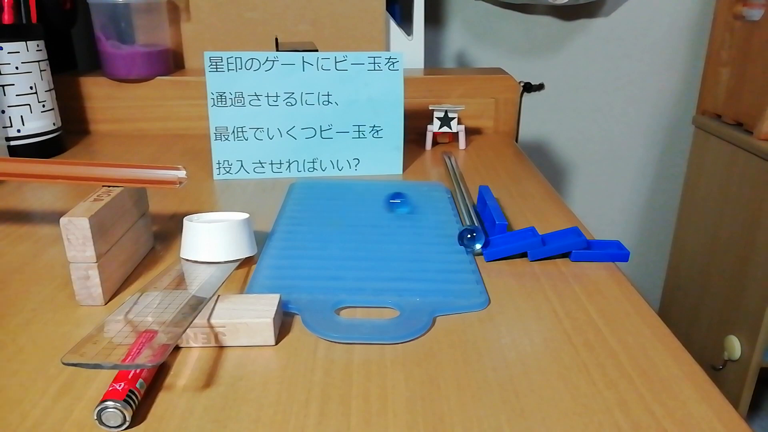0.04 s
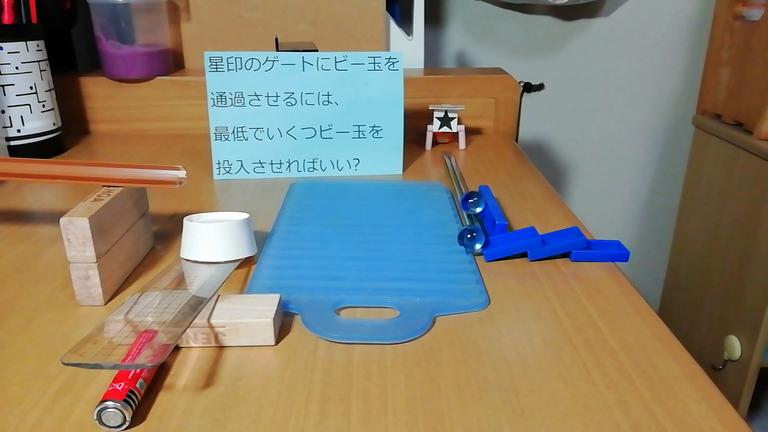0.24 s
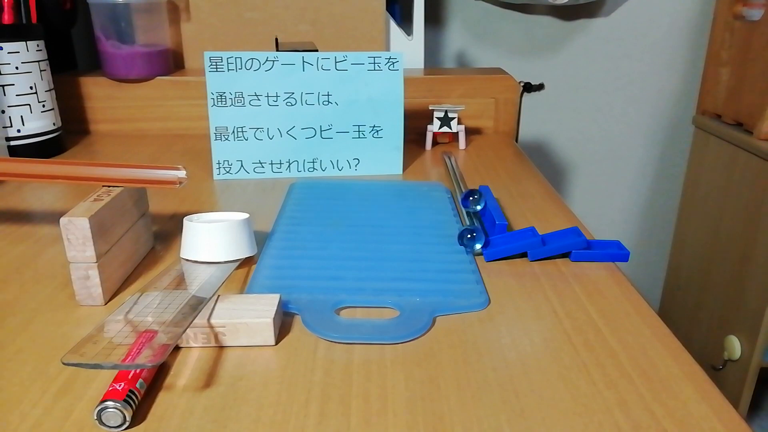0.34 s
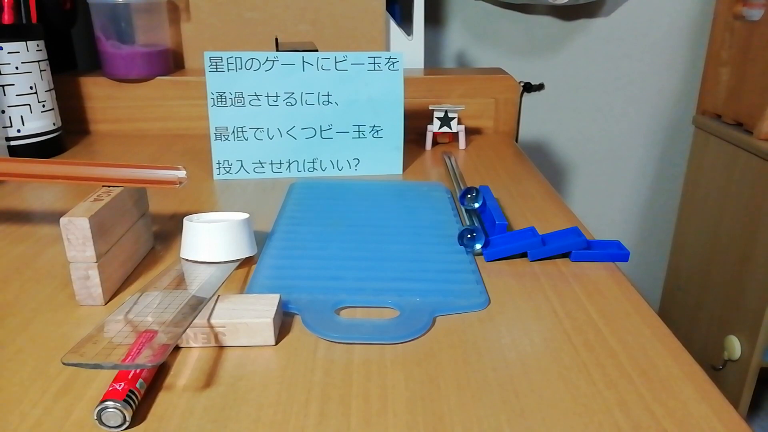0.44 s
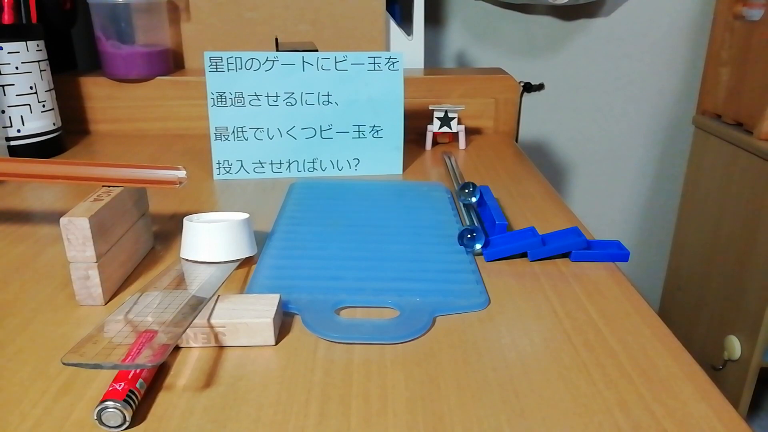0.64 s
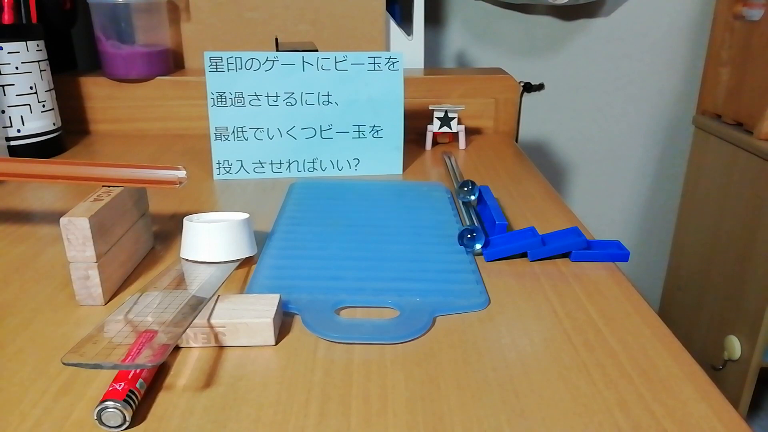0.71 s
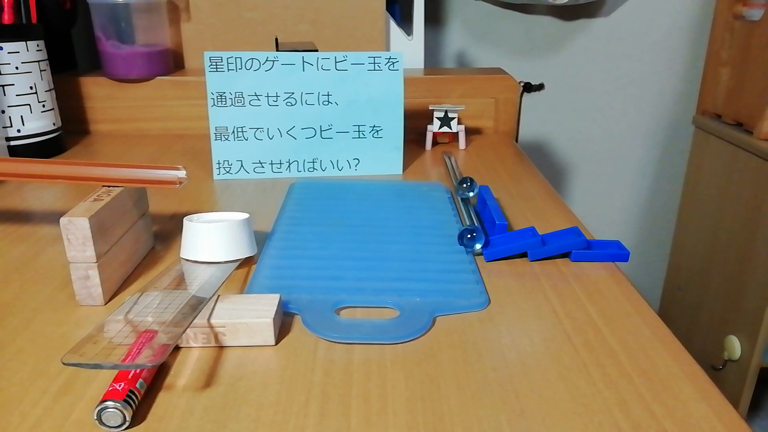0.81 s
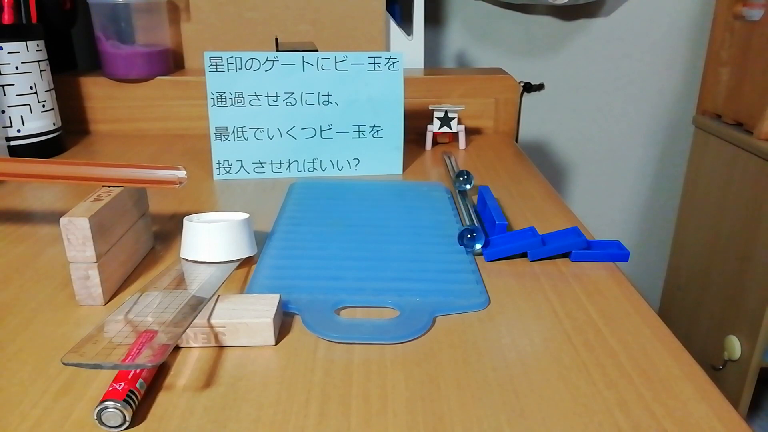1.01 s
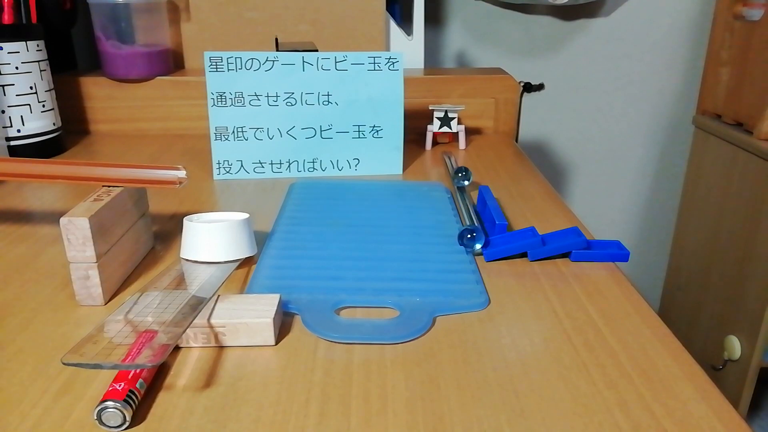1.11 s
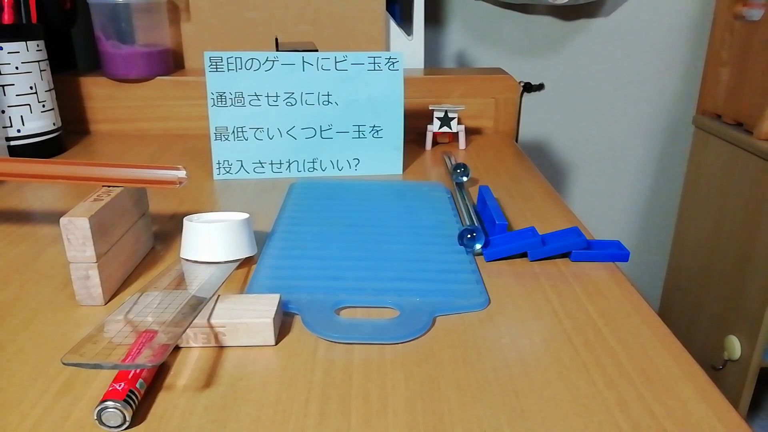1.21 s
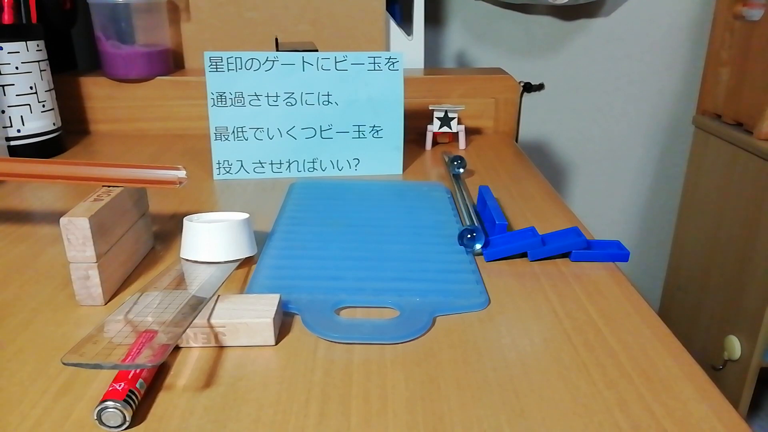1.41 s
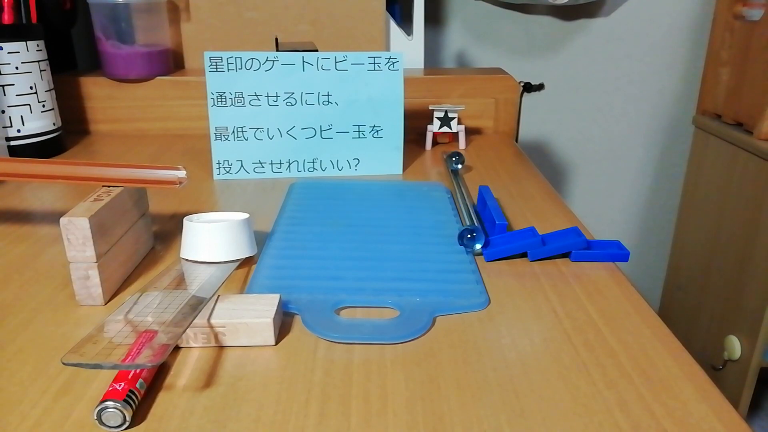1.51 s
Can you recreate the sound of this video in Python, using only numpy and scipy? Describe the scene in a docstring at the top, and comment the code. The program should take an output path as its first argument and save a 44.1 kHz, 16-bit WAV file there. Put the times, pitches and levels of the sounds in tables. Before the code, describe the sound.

Glass marbles clack together on a metal rail on a desk in a small, quiet room. At the start, a soft, hollow bump on a plastic board dies away. From about 0.2 to 0.3 seconds comes a cluster of bright clacks with a duller knock, then softer rebounds until 0.5. From 0.6 to 1.5 seconds one marble rolls very faintly, with scattered light ticks and a thin metallic ring.

```python
"""Marbles on a metal rail

A bump on a plastic board dies away. A glass marble drops against others on a metal rail on a desk:
the impacts give a few bright clacks and two duller knocks, and excite the modes of rail and desk.
One marble rolls off, ticking and making the rail sing faintly. The desk and the walls of a small
room reflect it all into two microphone ports that resonate near 9 kHz."""
import sys
import numpy as np
from scipy import signal
from scipy.fft import rfft, irfft
from scipy.io import wavfile
from scipy.ndimage import uniform_filter1d

SR = 44100
rng = np.random.default_rng(int(sys.argv[2]) if len(sys.argv) > 2 else 0)


def dump_mix(stems):
    """Bounce the given channels to the path in sys.argv[1] as a 16-bit WAV at rate SR."""
    frames = np.atleast_2d(stems).T  # one column per channel
    limited = np.clip(frames, -1, 1)  # hard clip at full scale
    pcm = np.round(limited * 32767).astype(np.int16)
    wavfile.write(sys.argv[1], SR, pcm)


N = 68355

# Spectra of the steady noises. Each row: frequency in Hz, relative level in dB.
RUMBLE_SPECTRUM = [(20, -0.5), (45, -4.5), (90, -3.5), (150, -4), (230, -14), (350, -24), (600, -47),
                   (2000, -52.5)]
AIR_SPECTRUM = [(100, 2), (1500, -1.5), (4000, -4), (9000, -10), (16000, -16.5)]
MICROPHONE_SPECTRUM = [(30, -13.5), (300, 2), (600, -2.5), (1300, 2), (2500, -1.5), (5000, -2.5),
                       (7500, -4.5), (11000, -8.5), (16000, -9.5)]

# Impacts. Each row: start in seconds, relative level in dB, left minus right in dB, cut-off in Hz.
BUMP = [(.001, -5.5, -1.5, 12140)]  # a marble bumps the plastic board
CLACKS = [(.2318, -1, 4.5, 14750), (.2432, -8, -6, 14780), (.2460, -17.5, -6.5, 15000)]  # the arriving marble strikes the waiting one
JOSTLES = [(.2750, -8.5, -3.5, 10500), (.2845, -3, 3.5, 10000), (.3090, -4.5, -4, 11500),
           (.3180, -11, 6.5, 11500)]  # the pair jostles as it settles
KNOCKS = [(.2883, -2.5, -1.5, 12960), (.3893, -23, 1, 6200)]  # a marble drops onto the rail
REBOUNDS = [(.4406, 1.5, 2, 11570), (.4895, -2, 5, 14500), (.4935, -4, -7, 10800)]  # it rebounds between the rods
TICKS = [(.6248, 1.5, -1, 10100), (.6865, -15, -10, 10300), (.7450, -18, 15, 9920),
         (.9045, -15.5, 5, 10000), (.9355, -9, 5, 9500), (1.1608, 1.5, -2, 10800), (1.1765, 1, -2, 10000),
         (1.1865, -1.5, 9, 10100), (1.2100, -5.5, -3, 10100), (1.4495, -1.5, -0.5, 9800),
         (1.4795, -7.5, 9, 10200)]  # it touches lightly as it rolls

# Spectra of the contacts. Each row: frequency in Hz, relative level in dB.
BUMP_SPECTRUM = [(60, -5), (170, -4.5), (245, 1.5), (330, 7), (500, -11.5), (800, 3), (1120, 6.5),
                 (1600, -6), (3000, -7.5), (6000, -11.5), (9000, -22), (15000, -33.5)]
CLACK_SPECTRUM = [(150, -33), (240, -24), (450, -29.5), (740, -22), (1150, -33), (1950, -19.5), (3400, -25),
                  (3900, -10), (5500, -18.5), (6500, -1.5), (7300, -14.5), (8300, -10), (9150, -4.5),
                  (9600, 3.5), (10000, -10), (10800, -8.5), (12600, -14.5), (14300, -25.5), (15200, -18.5)]
JOSTLE_SPECTRUM = [(300, -27), (1900, -24.5), (3000, -19.5), (4200, -15.5), (5500, -11.5), (6100, -2),
                   (7300, -7.5), (8300, -10.5), (8900, -0.5), (9250, -7), (10500, -15.5), (14000, -17)]
KNOCK_SPECTRUM = [(200, -38), (570, -33.5), (735, -12), (930, -30), (1500, -16), (2400, -16), (3300, -10.5),
                  (4000, -3), (4700, 1.5), (5500, -17), (6500, -11.5), (10000, -14.5), (12200, -26.5),
                  (13000, -5), (14500, -45)]
REBOUND_SPECTRUM = [(300, -18), (3300, -18.5), (4200, -5), (5500, -7), (6300, 9.5), (6900, -5.5),
                    (7400, 0.5), (8300, -11), (8900, -4), (10800, -13), (11300, -3.5), (12400, -7),
                    (13300, -12), (15500, -20)]
TICK_SPECTRUM = [(300, -20), (3000, -24), (4400, -5), (5400, -23), (6200, -12.5), (7200, -15),
                 (8700, -10.5), (9120, 5), (9480, -14), (15000, -24)]
ROLL_SPECTRUM = [(300, -9), (1500, -8.5), (4200, 4), (5500, -16), (7900, 7), (8600, -6.5), (9200, 5.5),
                 (10300, -12), (12400, -11), (16000, -19)]

# Normal modes. Each row: frequency in Hz, relative level in dB, time to decay by 60 dB in seconds.
BOARD_MODES = [(245, 0.5, 0.11), (320, -0.5, 0.1211), (1155, -8.5, .04)]
RAIL_MODES = [(4536, -21, 0.039), (6250, -11.5, .12), (6460, -2.5, 0.33), (6500, -5, 0.082),
              (7900, -10.5, 0.13), (8960, -3, 0.19)]
DESK_MODES = [(240, -3, 0.066), (732, -6, .035), (1520, 2, 0.055), (1950, 0.5, 0.046), (2612, -3.5, 0.12)]  # the rail's support and the desk top
SINGING_MODES = [(6277, -2, 0.041), (6620, 4, 0.014), (9440, -19, 0.03)]  # the rail under the rolling marble

# Swells of the rolling. Each row: time in seconds, contact hiss in dB, singing of the rail in dB.
ROLL_LEVELS = [(.55, -89.5, -112), (.85, -88.5, -100), (.92, -97, -82), (1.03, -88, -78.5),
               (1.12, -85.5, -87.5), (1.26, -92, -86), (1.33, -77, -84), (1.419, -98, -79.5),
               (1.462, -80, -68.5), (1.55, -76, -76)]

# Early reflections, a list per port, left then right. Each row: delay in seconds, relative level in dB.
ECHOES = [
    [(.0029, 2.5), (.0058, -8.5), (.0095, -10)],
    [(.0019, 1), (.0040, 0.5), (.0062, -7.5), (.0095, -8.5)],
]
# Reverberation of the room. Each row: frequency in Hz, time to decay by 60 dB in seconds.
ROOM_T60 = [(200, 0.32), (1500, 0.21), (5000, 0.2), (9000, 0.2), (15000, 0.087)]
# Port resonances, left then right. Each row: frequency in Hz, bandwidth in Hz, resonant gain in dB.
PORTS = [(9086, 223, 22.5), (8776, 810, 14)]


def undb(db):
    """Amplitude ratio of a level in dB."""
    return 10 ** (np.asarray(db) / 20)


def unit(x):
    """The signal scaled to unit RMS."""
    return x / np.sqrt(np.mean(x ** 2))


def along(points):
    """A table of (Hz, value) interpolated over log frequency at every bin of the spectrum."""
    hz, value = np.array(points, float).T
    bin_hz = np.arange(N + 1) * SR / (2 * N)
    return np.interp(np.log(bin_hz + 1), np.log(hz), value)


def colour(x, points):
    """Minimum-phase filtering: folding the cepstrum makes the (Hz, dB) response causal."""
    cepstrum = irfft(np.log(undb(along(points))))
    cepstrum[1:N] *= 2
    cepstrum[N + 1:] = 0
    return irfft(rfft(x, 2 * N) * np.exp(rfft(cepstrum)))[..., :N]


def convolve(x, response):
    """A linear system's output is its input convolved with its impulse response."""
    return signal.fftconvolve(np.atleast_2d(x), np.atleast_2d(response), axes=-1)[:, :N]


def background():
    """Steady random noise: low room rumble and a faint hiss of air, alike on both sides."""
    rumble = unit(colour(rng.standard_normal(N), RUMBLE_SPECTRUM))
    air = unit(colour(rng.standard_normal(N), AIR_SPECTRUM))
    return undb(-70.5) * rumble + undb(-84.5) * air


def contacts(rows, spectrum):
    """Impact excitation: each contact is a force pulse; the softer it is, the lower its cut-off."""
    pulses = np.zeros((2, N))
    for start_s, db, pan_db, cutoff_hz in rows:
        softness = signal.butter(4, cutoff_hz, fs=SR)
        pulse = signal.lfilter(*softness, signal.unit_impulse(64))
        gains = undb([db + pan_db / 2, db - pan_db / 2])
        start = int(start_s * SR)
        pulses[:, start:start + len(pulse)] += np.outer(gains, pulse)
    return colour(pulses, spectrum)


def diffuse_field(t60, build_s, alike_below_hz=1000):
    """Dense reflections build up and decay exponentially; long waves reach both ports nearly alike."""
    t = np.arange(N) / SR
    mid, side = rfft(rng.standard_normal((2, N)), 2 * N)
    apart = along([(alike_below_hz / 10, 0), (alike_below_hz / 2, .3), (alike_below_hz * 2, 1)])
    noise_spectrum = np.array([mid + apart * side, mid - apart * side])
    tail = 0
    for hz, seconds in t60:
        band = along([(f, float(f == hz)) for f, _ in t60])
        tail = tail + irfft(noise_spectrum * band)[:, :N] * np.exp(-np.log(1000) * t / seconds)
    spectrum = rfft(tail * (1 - np.exp(-t / build_s)), 2 * N)
    power = uniform_filter1d(np.abs(spectrum) ** 2, size=1500, axis=1)
    return irfft(spectrum / np.sqrt(power))[:, :N]  # even spectrum, unit energy


def space(x, echo_db, desk_db, desk_t60, room_db):
    """Multipath propagation: direct sound, inverted echoes, scatter on the desk and room reverberation."""
    early = np.zeros((2, N))
    early[:, 0] = 1
    for side, echoes in enumerate(ECHOES):
        for delay_s, db in echoes:
            early[side, int(delay_s * SR)] -= undb(db + echo_db)
    desk = diffuse_field([(1000, desk_t60)], build_s=.000998)
    room = diffuse_field(ROOM_T60, build_s=.0087)
    return convolve(x, early + undb(desk_db) * desk + undb(room_db) * room)


def ring(modes):
    """Free vibration: a body's impulse response is a sum of damped sinusoids, one per mode."""
    t = np.arange(N) / SR
    return sum(undb(db) * np.cos(2 * np.pi * hz * t) * np.exp(-np.log(1000) * t / t60)
               for hz, db, t60 in modes)


def board_bump():
    """An impact excites the low modes of the plastic board, which ring on with a hollow sound."""
    bump = undb(-15) * contacts(BUMP, BUMP_SPECTRUM)
    bump = space(bump, echo_db=-3, desk_db=7.5, desk_t60=.087, room_db=7)
    return bump + undb(-54.5) * convolve(bump, ring(BOARD_MODES))


def marble_impacts():
    """Brief, hard collisions radiate broadband clicks and set the rail and the desk in free vibration."""
    clacks = undb(2) * contacts(CLACKS, CLACK_SPECTRUM)
    jostles = contacts(JOSTLES, JOSTLE_SPECTRUM)
    knocks = undb(3) * contacts(KNOCKS, KNOCK_SPECTRUM)
    rebounds = undb(-28.5) * contacts(REBOUNDS, REBOUND_SPECTRUM)
    ticks = undb(-37.5) * contacts(TICKS, TICK_SPECTRUM)
    hits = (space(clacks, echo_db=.5, desk_db=6, desk_t60=.06, room_db=2.5)
            + space(jostles, echo_db=-4, desk_db=5, desk_t60=.035, room_db=5.5)
            + space(knocks, echo_db=-23, desk_db=9, desk_t60=.021, room_db=2.5)
            + space(rebounds, echo_db=2.5, desk_db=7, desk_t60=.13, room_db=0)
            + space(ticks, echo_db=.5, desk_db=3, desk_t60=.11, room_db=2))
    rail_and_desk = undb(-49.5) * ring(RAIL_MODES) + undb(-42.5) * ring(DESK_MODES)
    return hits + convolve(hits, rail_and_desk)


def rolling(bumps_per_s=2700, spread_db=3, wobbles_per_s=30, wobble_db=1.5):
    """Forced vibration: tiny random bumps under the marble hiss and keep the rail singing, in swells."""
    t = np.arange(N) / SR
    times, hiss_db, singing_db = np.array(ROLL_LEVELS).T
    bumps = (rng.random(N) < bumps_per_s / SR) * rng.choice([-1, 1], N)
    bumps = bumps * undb(spread_db * rng.standard_normal(N))
    # The marble presses unevenly as it turns.
    pressure_db = wobble_db * np.interp(t * wobbles_per_s, np.arange(N), rng.standard_normal(N))
    bumps = space(bumps * undb(pressure_db), echo_db=-.5, desk_db=8, desk_t60=.06, room_db=-3)
    hiss = unit(colour(bumps, ROLL_SPECTRUM))
    singing = unit(convolve(bumps, ring(SINGING_MODES)))
    return (hiss * np.interp(t, times, undb(hiss_db), left=0)
            + singing * np.interp(t, times, undb(singing_db), left=0))


def scene():
    """Superposition: the sound pressures of all sources add at each port."""
    return marble_impacts() + board_bump() + rolling() + background()


def record(dry, left_lag_s=.00057, top_hz=15700):
    """Each port resonates at its own pitch; the left lags, the microphones add hiss, the top is cut."""
    ports = []
    for x, (hz, width_hz, db) in zip(dry, PORTS):
        resonance = signal.iirpeak(hz, hz / width_hz, fs=SR)
        ports.append(x + undb(db) * signal.lfilter(*resonance, x))
    left, right = ports
    left = np.pad(left, (int(left_lag_s * SR), 0))[:N]
    hiss = undb(-73) * unit(colour(rng.standard_normal((2, N)), MICROPHONE_SPECTRUM))
    low_pass = signal.ellip(8, .2, 70, top_hz, fs=SR, output="sos")
    return signal.sosfilt(low_pass, np.array([left, right]) + hiss)


dry = scene()
out = record(dry)
dump_mix(out)
```